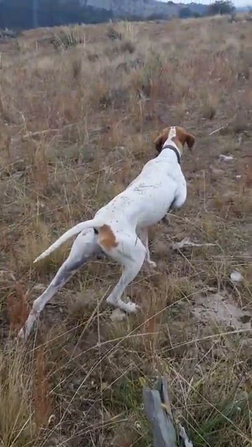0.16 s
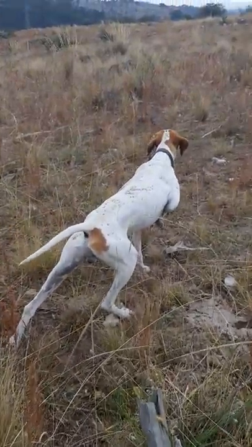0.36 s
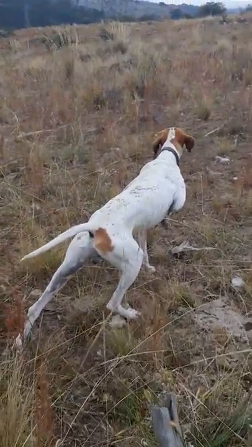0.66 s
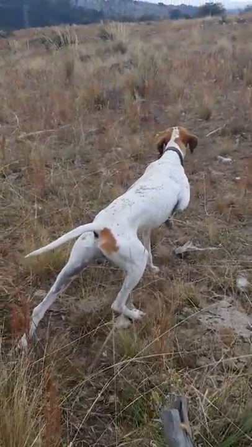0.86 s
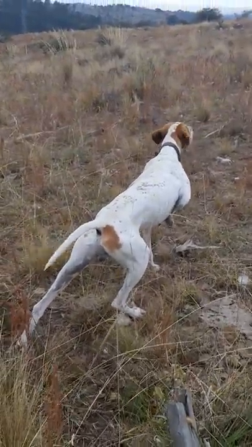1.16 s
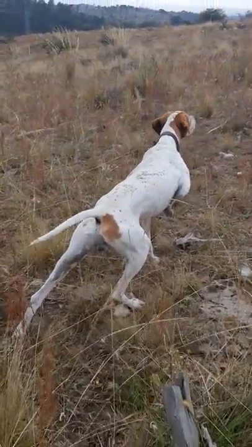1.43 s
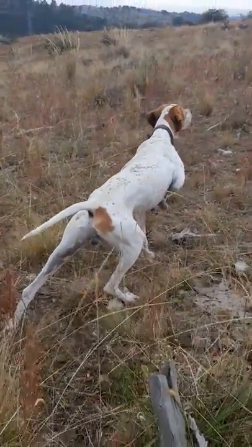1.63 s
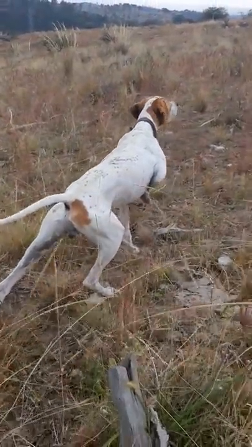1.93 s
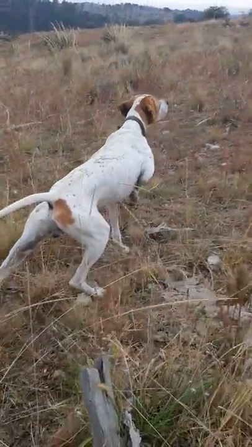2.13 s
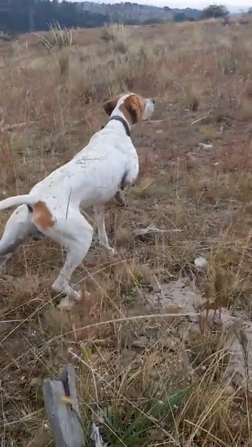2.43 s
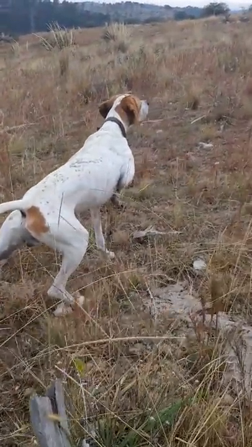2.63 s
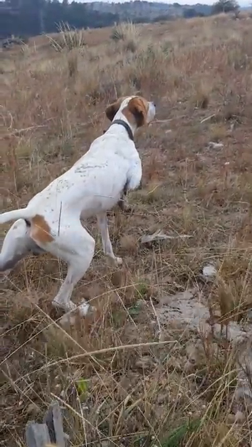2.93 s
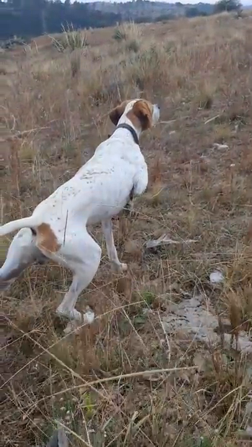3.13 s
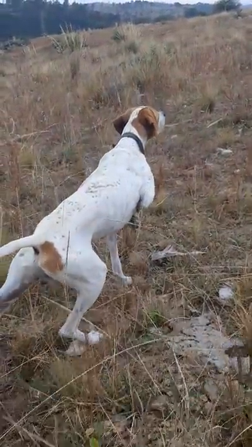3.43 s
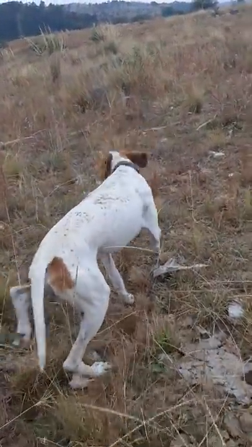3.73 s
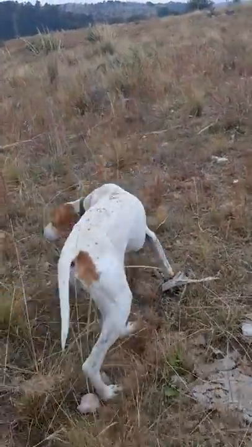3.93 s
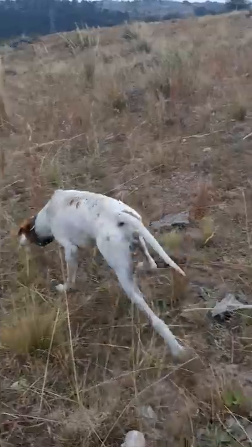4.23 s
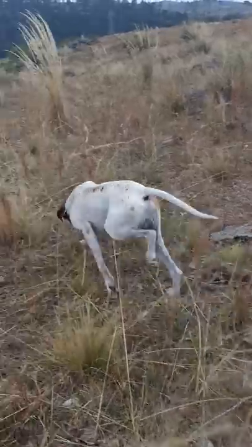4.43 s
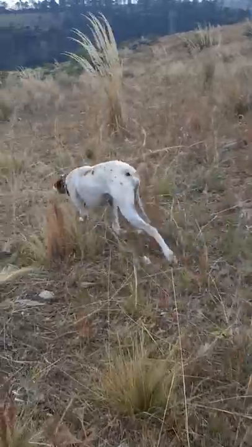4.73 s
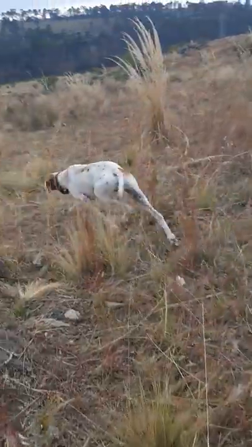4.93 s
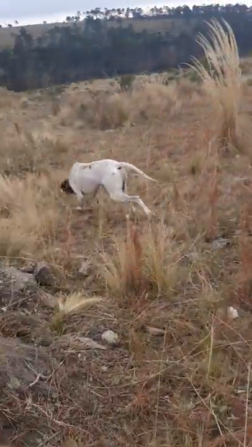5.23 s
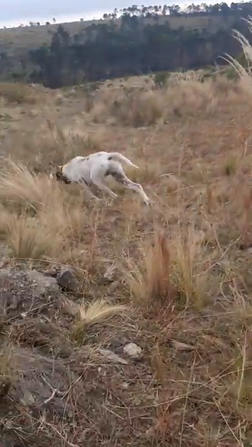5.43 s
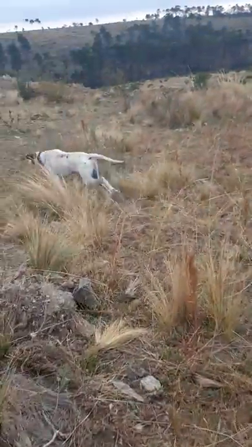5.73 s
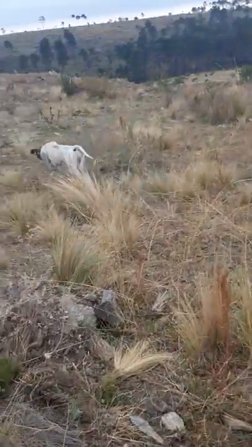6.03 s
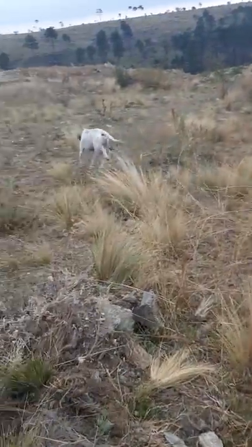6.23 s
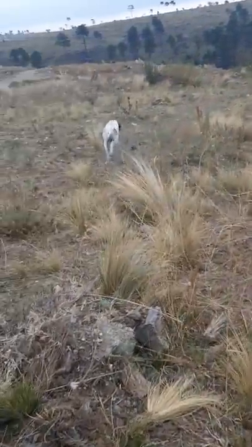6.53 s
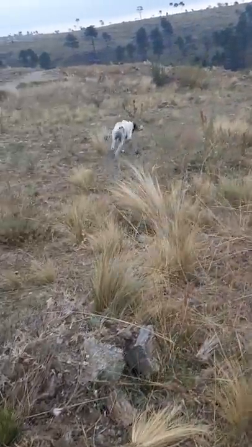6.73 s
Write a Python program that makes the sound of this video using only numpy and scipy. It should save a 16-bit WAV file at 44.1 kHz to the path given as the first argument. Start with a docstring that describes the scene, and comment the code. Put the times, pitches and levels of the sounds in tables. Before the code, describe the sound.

A quiet open hillside with a faint, low-weighted air hiss. From 0 to 3.3 seconds someone creeps behind a silent dog: barely audible footfalls, sparse dry ticks and light brushes of grass at about 0.1 and 0.8, soft low air puffs from 1.7 to 2.2, and a small cluster of crisp stem snaps around 2.4 to 2.8. Near 3.4 a sharp snap leads into striding. From 3.55 to 4.2 comes the strongest rush of bright, hissing blades, crackling stalks and crunch, with a wind bump at 3.77. Brisk uneven swishes and steps follow, fuller around 4.6 to 5.1, with a small low knock at 4.94, then another crackly sweep around 5.7. Wind puffs thud at 6.1 to 6.6, mostly left, as the rustling softens, with late snaps at 6.2 and 6.57. The hand-held microphone hears the grass close, brighter on the right.

```python
"""First come soft footfalls and faint crackling: someone creeps through dry grass on an open
hillside behind a silent dog, then from about 3.5 s strides on, louder and brighter.
Crackle, snaps and swish are tiny breaks and rubbing noise; footfalls also crush litter into the soil.
Light air buffets the two ports of a hand-held microphone; the right port faces the ground."""
import sys
import numpy as np
from scipy import signal
from scipy.fft import rfft, irfft, next_fast_len
from scipy.io import wavfile

SR = 44100
rng = np.random.default_rng(int(sys.argv[2]) if len(sys.argv) > 2 else 0)


def master(y):
    """Save y as 16-bit WAV."""
    cut = np.clip(np.atleast_2d(y).T, -1, 1)
    pcm = np.round(cut * 32767)  # scale
    wavfile.write(sys.argv[1], SR, pcm.astype(np.int16))


N = 302647  # length in samples

# Levels of grass sounds hold before the ports; all levels hold before record().
# A foot comes down and rolls off. Columns: t/s of full weight, rise/s, litter level/dB
FOOTFALLS = [(.01, 0.07, -54.5), (.12, 0.046, -52.5), (2.255, 0.055, -58), (3.385, 0.066, -54.5),
             (3.639, 0.035, -41), (3.81, 0.078, -49), (3.914, 0.0052, -39.5), (4.374, 0.024, -47.5),
             (4.811, 0.056, -37.5), (5.004, 0.052, -38), (5.66, 0.056, -41.5), (5.755, 0.066, -40.5),
             (6.115, 0.081, -47.5), (6.245, 0.055, -43.5), (6.336, 0.038, -45)]
# A leg sweeps through a tuft. Columns: t/s of deepest bend, rise/s, stalk level/dB, blade level/dB
LEG_BRUSHES = [(.11, 0.017, -47, -62), (0.793, 0.0087, -45.5, -42), (1.702, 0.081, -56, -53),
               (2.44, 0.065, -51, -43.5), (3.07, 0.018, -47, -46), (3.13, 0.068, -49.5, -49.5),
               (3.189, 0.0088, -43, -40), (3.578, 0.033, -37, -28), (3.643, 0.016, -41, -29),
               (3.817, 0.015, -34, -26), (3.913, 0.027, -33, -17.5), (4.176, 0.014, -33, -20),
               (4.379, 0.12, -49, -26.5), (4.472, 0.017, -40, -27.5), (4.588, 0.011, -39, -21),
               (4.657, 0.026, -43.5, -22), (4.769, 0.032, -39, -20), (4.91, 0.039, -41, -24),
               (5.029, 0.07, -54, -27), (5.259, 0.034, -44, -25), (5.485, 0.086, -42, -24.5),
               (5.69, 0.12, -35, -22), (5.988, 0.046, -42.5, -27.5), (6.189, 0.12, -41.5, -24.5),
               (6.33, 0.045, -74, -25), (6.71, 0.24, -48, -36.5)]
# Stalks stirring between the strokes. Columns: t/s, level/dB
GRASS_STIR = [(0, -66), (.3, -61.5), (1.0, -68.5), (1.3, -68), (1.5, -60), (2.3, -59.5), (3.0, -63),
              (3.5, -53), (3.75, -43), (4.7, -46), (5.2, -52), (5.6, -37.5), (5.93, -67), (6.5, -54.5),
              (6.86, -62.5)]
# Short snaps of stems and twigs, and one low knock on the microphone at 4.936 s.
# Columns: t/s, level/dB before the shared lift in snaps_and_knock(), f/Hz
SNAPS_AND_KNOCK = [(.3383, -43, 5400), (.3974, -45, 4600), (.4945, -38.5, 1100), (1.9493, -34.5, 6000),
                   (2.187, -36, 5200), (2.2224, -38, 2400), (2.2583, -36, 2000), (2.4243, -27, 12000),
                   (2.44, -21.5, 14000), (2.4501, -29, 11000), (2.488, -35, 10500), (2.5019, -37, 5900),
                   (2.542, -38, 4000), (2.5807, -33, 3400), (2.7632, -27, 3900), (2.8538, -42, 3400),
                   (3.328, -38, 4000), (3.3928, -36, 3200), (3.4235, -21, 14000), (3.4373, -37, 5200),
                   (3.539, -24, 9000), (3.6138, -26, 6700), (3.6338, -25, 5500), (3.6969, -20, 5300),
                   (3.7937, -17, 6500), (3.7961, -17.5, 7600), (3.813, -21, 10500), (4.135, -29, 6000),
                   (4.332, -28, 3400), (4.586, -22.5, 13500), (4.74, -22.5, 12500), (4.7743, -15.5, 11800),
                   (4.821, -27, 1500), (4.902, -25, 6000), (4.9361, -31, 650), (4.958, -23, 11000),
                   (5.0027, -25, 1000), (5.0135, -25, 1600), (5.3016, -27, 4000), (5.4455, -25, 9000),
                   (5.6227, -17.5, 10000), (5.7293, -21.5, 5000), (5.7525, -25, 900), (5.8188, -24, 1100),
                   (5.9652, -17, 12700), (6.1961, -21, 14100), (6.5657, -19, 11500)]
# Soft hollow scuffs and low thumps; the one at 2.018 s is a puff-like thump.
# Columns: t/s of the start, length/s, f/Hz, level/dB
SCUFFS_AND_THUMPS = [(1.849, 0.059, 650, -62), (2.018, 0.016, 189, -61.5), (3.558, 0.068, 680, -58),
                     (4.013, 0.08, 395, -59), (4.638, 0.05, 366, -49.5), (4.983, 0.055, 1470, -35.5),
                     (6.61, 0.071, 1055, -52)]
# Moving air at the left port. Columns: t/s, level/dB before its lumps
BREEZE_LEVEL = [(1.2, -81), (1.5, -59.5), (2.25, -62.5), (2.5, -79), (3.55, -61), (3.85, -45.5), (4.4, -56),
                (4.98, -47), (5.25, -61), (6.05, -63), (6.4, -45), (6.75, -61)]
# Puffs of air. Columns: t/s of the middle, peak level/dB before the churn, port hit
AIR_PUFFS = [(1.736, -36, "left"), (1.987, -41.5, "right"), (2.027, -42.5, "right"), (2.212, -39.5, "left"),
             (2.642, -50.5, "left"), (3.347, -40, "left"), (3.631, -39.5, "left"), (3.771, -26.5, "left"),
             (3.819, -33.5, "left"), (4.001, -39, "left"), (4.26, -43.5, "left"), (4.669, -34.5, "left"),
             (4.85, -35, "left"), (5.177, -38.5, "left"), (6.099, -39.5, "left"), (6.237, -27.5, "left"),
             (6.449, -33.5, "left"), (6.596, -37.5, "left")]

# Tone colours of the sources: only their shape counts. Columns: f/Hz, relative level/dB
SOIL_COLOUR = [(150, -19), (330, -4), (600, 6.5), (900, 0), (1500, -34.5)]
LITTER_COLOUR = [(500, -18.5), (780, -1.5), (1400, 3), (2200, 1), (4500, -12)]
STALK_COLOUR = [(700, -33), (1500, -8), (2800, -2), (5200, 6), (7500, 1.5), (12000, -39)]
BLADE_COLOUR = [(4000, -22), (12000, 4), (14500, 6), (15700, 5.5)]
WIND_COLOUR = [(22, -5), (65, 9.5), (150, -9.5), (1500, -82)]
FAR_AIR_COLOUR = [(50, 7.5), (700, -8), (16000, -30)]

# Share of the sound common to both ports. Columns: f/Hz, share (0 to 1)
PORT_LIKENESS = [(700, 0.91), (2500, 0.45), (6000, 0)]
# How late the sound reaches the left port. Columns: f/Hz, lag/s
LEFT_PORT_LAG = [(900, 0.00042), (2500, 0.0004453)]
# Shade of the housing over the left port. Columns: f/Hz, level/dB
LEFT_PORT_SHADE = [(900, 0.5), (1500, -3), (2500, -6), (5200, -12), (9000, -5), (15000, -10.5)]
# Tone colour of both ports. Columns: f/Hz, level/dB
PORT_COLOUR = [(7200, -2.5), (8000, -15.5), (8700, -28), (10000, -17.5), (12000, -12)]
# Rings of the housing. Columns: f/Hz, width/Hz, gain (plain factor)
HOUSING_RINGS = [(1540, 32, 1.55), (2040, 30, 0.65)]

# What a footfall also sets off, relative to its litter crunch
FOOT_STALKS_DB, FOOT_BLADES_DB, FOOT_SOIL_DB = 2.5, 15, -3
# Crunch of a bare touch and of full weight; share of the force while creeping
TOUCH_DB, FULL_WEIGHT_DB, CREEP_SHARE = -59.5, -32, 0.084
# The force grows to full during the STRIDE_CHANGE_S before FULL_STRIDE_S
FULL_STRIDE_S, STRIDE_CHANGE_S = 3.63, 0.3
# Litter dragged by a brushed tuft, relative to its stalks
BRUSH_LITTER_DB = -19.5
# Blades and litter relative to the mean stir; dB they change per dB of the stalks
STIR_BLADES_DB, STIR_LITTER_DB, STIR_GROWTH = 9, -12.5, 1.18
# Shape of every swell (1 pointed, 2 rounded); how much slower it lets go than it presses
SWELL_SHAPE, RELEASE_RATIO = 1.78, 1.39
# Level of a puff at the port it does not hit, relative to the other
FAR_PORT_DB = -56
# The finished sound lies between these limits
LOW_CUT_HZ, CUTOFF_HZ = 30, 15850


def grass():
    """The sole crushes litter and soil, stalks bend and break, blades slide along the legs."""
    litter_gain, stalk_gain, blade_gain = walk()
    litter = litter_gain * fractures(LITTER_COLOUR, per_s=300, spread_db=2.5, decay_s=.0015,
                                     rub=.9, clump_db=2)
    # only strong pressure goes through to the soil
    weight = np.interp(20 * np.log10(litter_gain), [TOUCH_DB, FULL_WEIGHT_DB], [0, 1]) * gait()
    soil_gain = litter_gain * from_db(FOOT_SOIL_DB) * weight
    soil = soil_gain * fractures(SOIL_COLOUR, per_s=170, spread_db=3.5, decay_s=.0083,
                                 rub=.11, clump_db=4)
    bending = fractures(STALK_COLOUR, per_s=500, spread_db=4.6, decay_s=.0008, rub=.7, clump_db=1.7)
    stalk_ticks = stems(STALK_COLOUR, 1760, 7670)
    stalks = stalk_gain * rms_one(bending + stalk_ticks / np.sqrt(2))
    sliding = fractures(BLADE_COLOUR, per_s=500, spread_db=4.8, decay_s=.0007, rub=.85, clump_db=1.4)
    blade_ticks = stems(BLADE_COLOUR, 11800, CUTOFF_HZ)
    blades = blade_gain * rms_one(sliding + .5 * blade_ticks)
    return litter + soil + stalks + blades


def walk():
    """Gains of litter, stalks and blades: the powers of footfalls, brushing legs and stir add up."""
    stir_db, = in_time(GRASS_STIR)
    steeper_db = stir_db.mean() + STIR_GROWTH * (stir_db - stir_db.mean())
    feet = sum((from_db(db) * swell(s, rise_s)) ** 2 for s, rise_s, db in FOOTFALLS)
    litter = feet + from_db(steeper_db + STIR_LITTER_DB) ** 2
    stalks = feet * from_db(FOOT_STALKS_DB) ** 2 + from_db(stir_db) ** 2
    foot_blades = feet * gait() * from_db(FOOT_BLADES_DB) ** 2
    blades = foot_blades + from_db(steeper_db + STIR_BLADES_DB) ** 2
    for s, rise_s, stalks_db, blades_db in LEG_BRUSHES:
        bend = swell(s, rise_s)
        stalks = stalks + (from_db(stalks_db) * bend) ** 2
        litter = litter + (from_db(stalks_db + BRUSH_LITTER_DB) * bend) ** 2
        blades = blades + (from_db(blades_db) * bend) ** 2
    return np.sqrt([litter, stalks, blades])


def gait():
    """Share of full force in the step: creeping at first, then striding."""
    change_s = [FULL_STRIDE_S - STRIDE_CHANGE_S, FULL_STRIDE_S]
    return np.interp(np.arange(N) / SR, change_s, [CREEP_SHARE, 1])


def swell(s, rise_s):
    """Pressure on the grass builds up to 1 at time s, then lets go more slowly."""
    t = np.arange(N) / SR - s
    distance = np.abs(t / rise_s / np.where(t < 0, 1, RELEASE_RATIO))
    return np.exp(-np.minimum(distance, 10) ** SWELL_SHAPE)


def break_sizes(spread_db):
    """Uneven sizes of breaks: many small ones, a few large ones up to a limit."""
    return from_db(spread_db * np.minimum(rng.exponential(1, N), np.pi))


def fractures(spectrum, per_s, spread_db, decay_s, rub, clump_db):
    """Tiny breaks burst and die away over smooth rubbing, in clumps; two directions, rms 1."""
    breaks = (rng.random(N) < per_s / SR) * break_sizes(spread_db) ** 2
    fade = np.exp(-2 / (decay_s * SR))
    power = signal.lfilter([1], [1, -fade], breaks + 1e-18)
    clumps = from_db(clump_db * drift(70))
    bursts = np.sqrt(power / power.mean() + abs(rub)) * clumps
    return rms_one(colour(bursts * rng.standard_normal((2, N)), spectrum))


def stems(spectrum, low_hz, high_hz, per_s=380, spread_db=3.0, width_hz=600, count=16):
    """Each tick rings one of several stem pitches for a few cycles; two directions, rms 1."""
    sizes = break_sizes(spread_db) * rng.choice([-1, 1], (2, N))
    ticks = sizes * (rng.random(N) < per_s / SR)
    stem_number = rng.integers(0, count, N)
    ringing = np.zeros((2, N))
    for k, hz in enumerate(np.linspace(low_hz, high_hz, count)):
        ringing += band(ticks * (stem_number == k) + 1e-18, hz, width_hz)
    return rms_one(colour(ringing, spectrum))


def snaps_and_knock(width=1.5, tail_db=-9, tail_s=.0018, edge_hz=5200, edge_db=-4.5,
                    widest_hz=8000, lift_db=1.8):
    """Each snap, and the one knock, is a pulse through a body and a crisp edge, with a short noisy tail."""
    out, t = np.zeros((2, N)), np.arange(SR // 20) / SR
    for s, db, hz in SNAPS_AND_KNOCK:
        noise = rng.standard_normal((2, len(t)))
        scatter = np.exp(-t / tail_s) * noise * np.sqrt(2 / (tail_s * SR))
        pulse = (t == 0) + from_db(tail_db) * scatter
        # a thicker stem has a lower body
        body = rms_one(double_band(pulse, hz, min(hz * width, widest_hz)))
        bright_hz = max(hz, edge_hz)
        edge = rms_one(double_band(pulse, bright_hz, min(bright_hz * width, widest_hz)))
        crack = body + from_db(edge_db) * edge
        # level as if all the energy fell within one millisecond
        per_ms = np.sqrt(np.sum(crack ** 2, axis=1, keepdims=True) * 1000 / SR)
        add(out, s, from_db(db + lift_db) * crack / per_ms)
    return out


def scuffs_and_thumps(width_hz=330):
    """Each scuff or thump is a brief stroke of noise in one hollow resonance."""
    out = np.zeros((2, N))
    for s, length_s, hz, db in SCUFFS_AND_THUMPS:
        stroke = signal.windows.tukey(int(length_s * SR))
        hollow = double_band(rng.standard_normal((2, len(stroke))), hz, width_hz)
        add(out, s, from_db(db) * stroke * rms_one(hollow))
    return out


def springing(level_db=-67):
    """Trodden stalks spring back with sparse, faint dry ticks throughout."""
    return from_db(level_db) * stems(STALK_COLOUR, 1500, 7500, per_s=12, width_hz=2500)


def wind(right_db=-14):
    """Lumpy low turbulence, unrelated at the two ports and weaker on the right, plus puffs."""
    breeze_db, = in_time(BREEZE_LEVEL)
    lumps = from_db(3.5 * drift(20))
    turbulence = rms_one(colour(rng.standard_normal((2, N)), WIND_COLOUR))
    rumble = turbulence * lumps * from_db(breeze_db)
    return rumble * from_db([[0], [right_db]]) + puffs()


def puffs(swing_hz=66, cycles=1.05, churn_db=-16, churn_hz=145):
    """An eddy crosses a port: the pressure swings briefly, churns a little and is gone."""
    out, t = np.zeros((2, N)), np.arange(-SR // 20, SR // 20) / SR
    for s, db, port in AIR_PUFFS:
        reach = from_db([[0 if side == port else FAR_PORT_DB] for side in ("left", "right")])
        hz = swing_hz * from_db(rng.uniform(-1, 1))  # each puff about 12 % higher or lower at most
        noise = rng.standard_normal((2, len(t)))
        churn = rms_one(double_band(noise, churn_hz, churn_hz / 2))
        swing = np.sin(2 * np.pi * (hz * t + rng.random((2, 1))))
        passing = 1 / np.cosh(2 * hz * t / cycles)
        add(out, s + t[0], from_db(db) * reach * (swing + from_db(churn_db) * churn) * passing)
    return out


def far_air(level_db=-75.5):
    """The quiet of the open hill: steady noise, strongest in the lows, separate at each port."""
    return from_db(level_db) * rms_one(colour(rng.standard_normal((2, N)), FAR_AIR_COLOUR))


def ports(sound):
    """The right port hears the ground directly; the left hears it later, duller, partly scattered."""
    direct, scattered = rfft(sound, padded_size())
    hz = np.linspace(0, SR / 2, len(direct))
    share = np.clip(at_hz(PORT_LIKENESS, hz), 0, 1)
    mixed = share * direct + np.sqrt(1 - share ** 2) * scattered
    delay = np.exp(-2j * np.pi * hz * at_hz(LEFT_PORT_LAG, hz))
    left = irfft(mixed * delay)[:N]
    return np.array([colour(left, LEFT_PORT_SHADE), sound[0]])


def from_db(db):
    """Decibels to gain."""
    return 10 ** (np.asarray(db) / 20)


def rms_one(x):
    """Scale to unit power."""
    return x / np.sqrt(np.mean(x ** 2) + 1e-20)


def in_time(rows):
    """The columns of a time table, drawn as lines through every sample."""
    s, *columns = np.transpose(rows)
    return [np.interp(np.arange(N) / SR, s, column) for column in columns]


def at_hz(points, hz):
    """Read a frequency table on a log-frequency axis."""
    known_hz, values = np.transpose(points)
    return np.interp(np.log(hz + 1), np.log(known_hz), values)  # + 1 avoids log(0)


def padded_size():
    """Transform length with room for filter tails."""
    return 2 * next_fast_len(N // 2 + SR // 10)


def colour(x, spectrum):
    """Filter with the given spectrum that answers only after its input (minimum phase)."""
    size = padded_size()
    gains = from_db(at_hz(spectrum, np.fft.rfftfreq(size, 1 / SR)))
    cepstrum = irfft(np.log(gains))
    # folding the second half onto the first removes any sound ahead of its cause
    cepstrum[1:size // 2] *= 2
    cepstrum[size // 2 + 1:] = 0
    return irfft(rfft(x, size) * np.exp(rfft(cepstrum)))[..., :N]


def band(x, hz, width_hz):
    """One resonance, gain about 1 on top."""
    r = np.exp(-np.pi * width_hz / SR)
    feed = np.array([1, 0, -1]) * (1 - r * r) / 2
    feedback = [1, -(1 + r * r) * np.cos(2 * np.pi * hz / SR), r * r]
    return signal.lfilter(feed, feedback, x)


def double_band(x, hz, width_hz):
    """The same resonance twice, for steeper sides."""
    return band(band(x, hz, width_hz), hz, width_hz)


def drift(rate):
    """Random wander with spread 1, drawn as lines between `rate` random points per second."""
    knots = rng.standard_normal(N // 20)
    return rms_one(np.interp(np.arange(N) / SR * rate, np.arange(len(knots)), knots))


def add(out, s, sound):
    """Mix a short sound in, starting at time s."""
    start = max(round(s * SR), 0)
    out[..., start:start + sound.shape[-1]] += sound[..., :N - start]


def scene():
    """Steps in grass, snaps, scuffs and thumps reach the ports, with wind and far air on top."""
    ground = grass() + snaps_and_knock() + scuffs_and_thumps() + springing()
    return ports(ground) + wind() + far_air()


def record(dry):
    """The housing rings, the ports hollow out the treble; deep rumble and the very top are cut."""
    rung = dry + sum(gain * band(dry, hz, width_hz) for hz, width_hz, gain in HOUSING_RINGS)
    low_cut = signal.butter(2, LOW_CUT_HZ, "high", fs=SR, output="sos")
    voiced = signal.sosfilt(low_cut, colour(rung, PORT_COLOUR))
    top_cut = signal.ellip(12, .1, 70, CUTOFF_HZ, fs=SR, output="sos")
    return signal.sosfilt(top_cut, voiced)


dry = scene()
out = record(dry)
master(out)
```